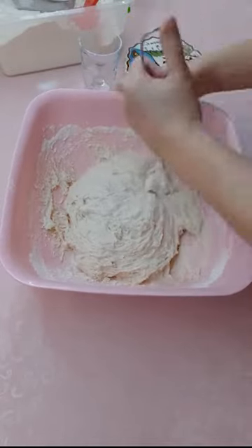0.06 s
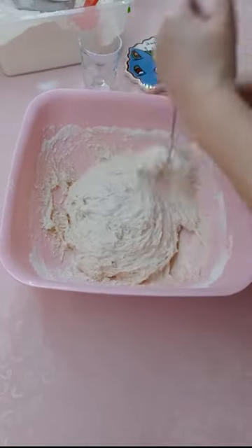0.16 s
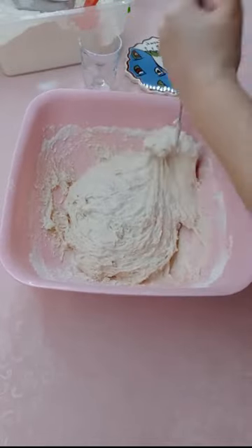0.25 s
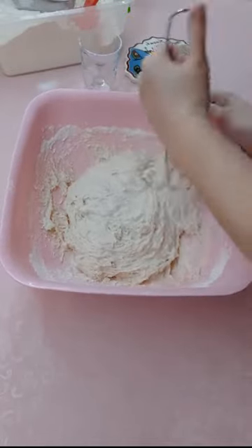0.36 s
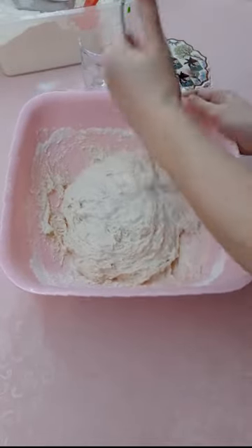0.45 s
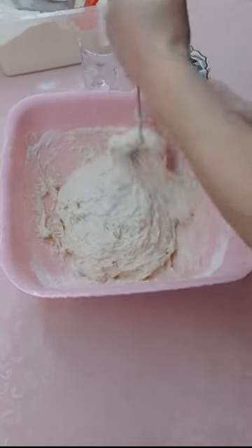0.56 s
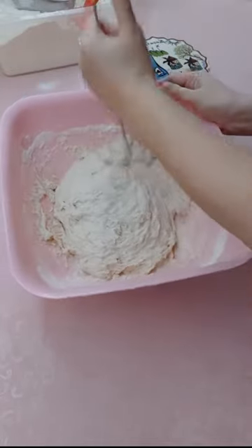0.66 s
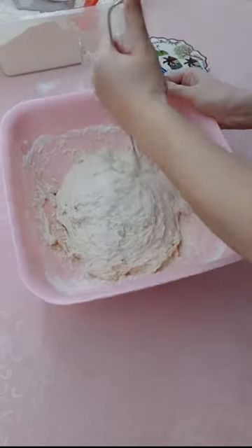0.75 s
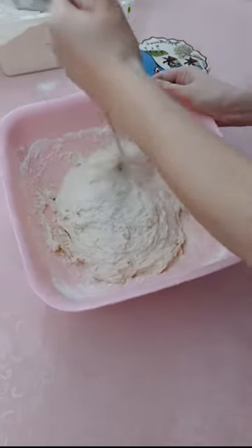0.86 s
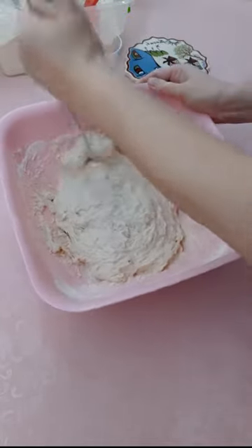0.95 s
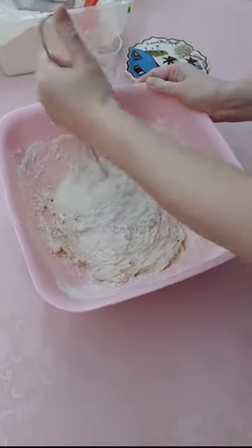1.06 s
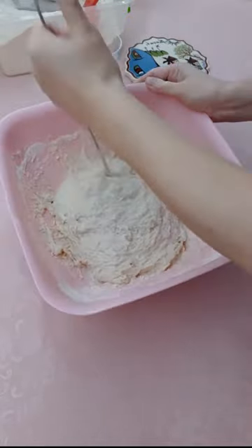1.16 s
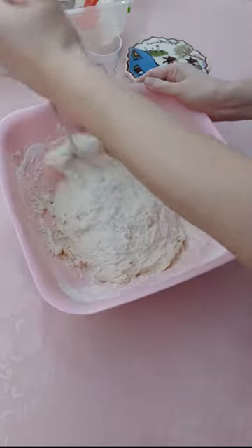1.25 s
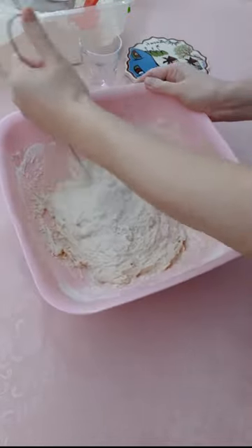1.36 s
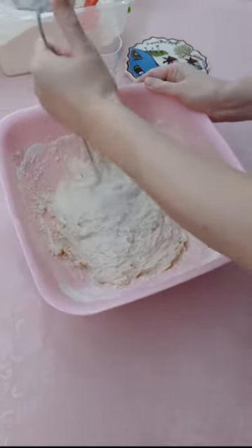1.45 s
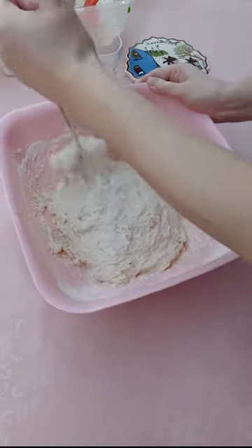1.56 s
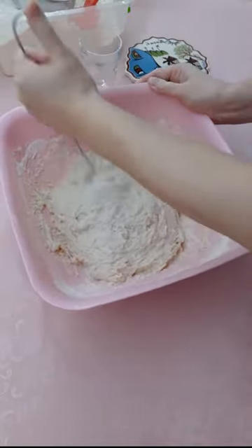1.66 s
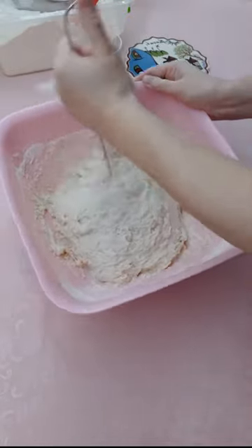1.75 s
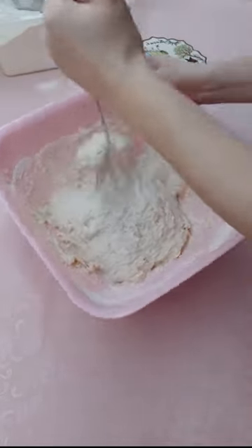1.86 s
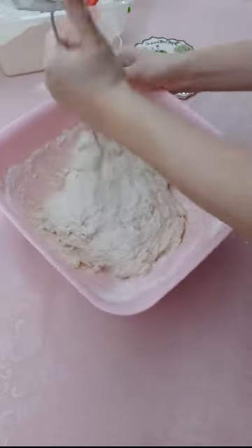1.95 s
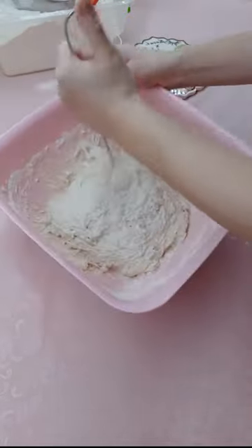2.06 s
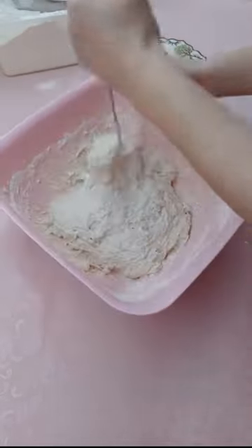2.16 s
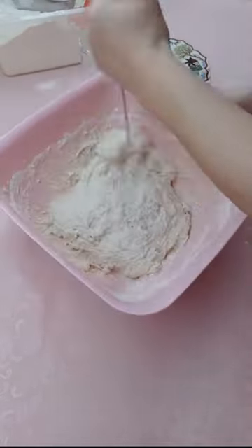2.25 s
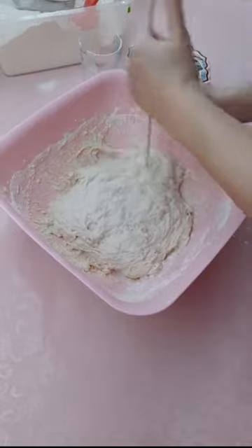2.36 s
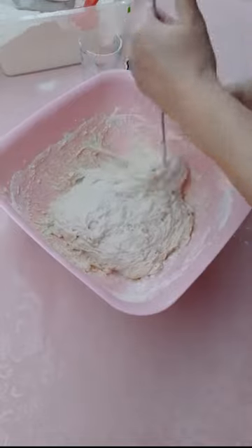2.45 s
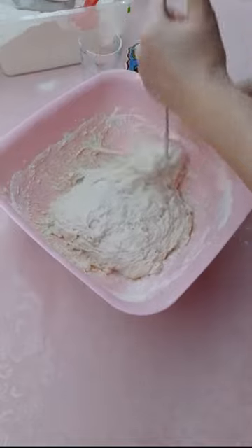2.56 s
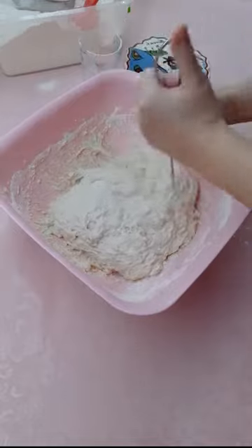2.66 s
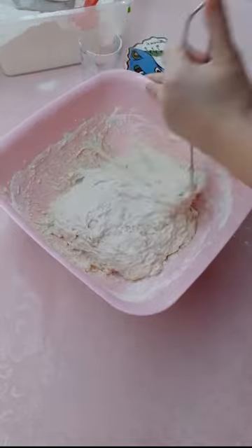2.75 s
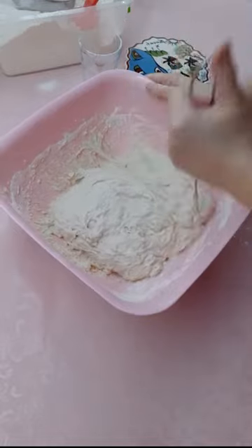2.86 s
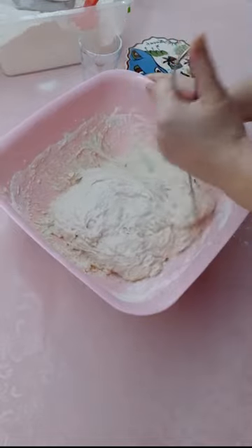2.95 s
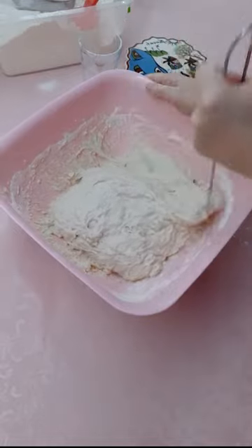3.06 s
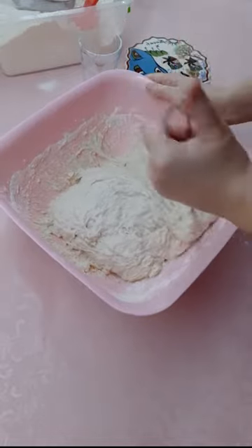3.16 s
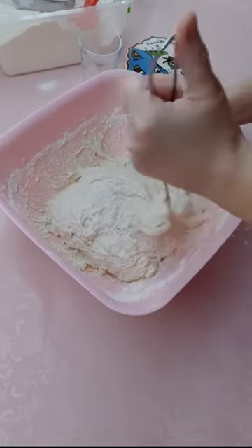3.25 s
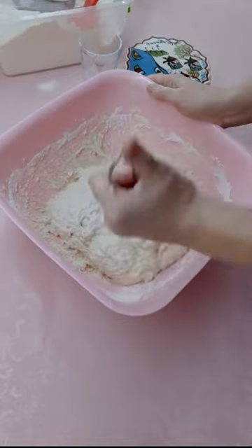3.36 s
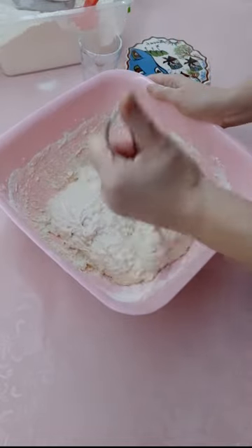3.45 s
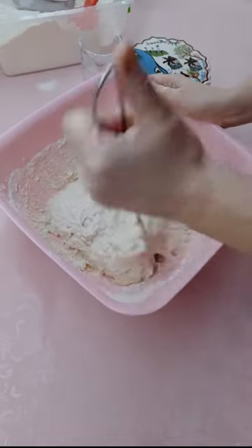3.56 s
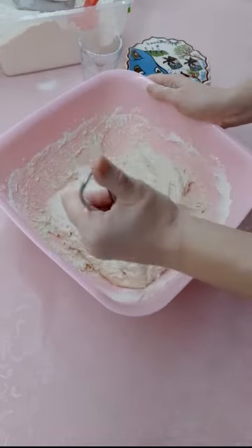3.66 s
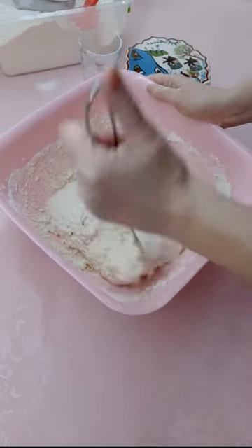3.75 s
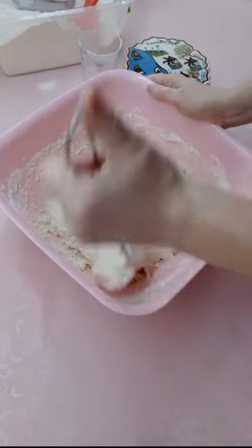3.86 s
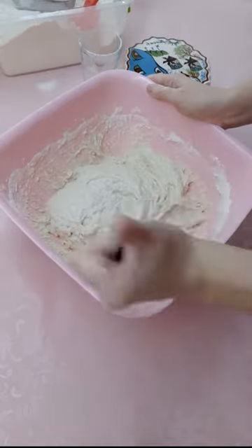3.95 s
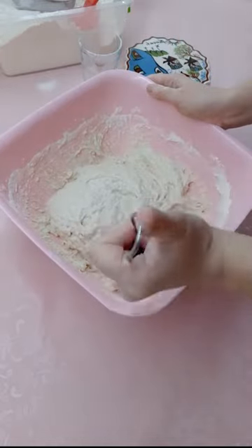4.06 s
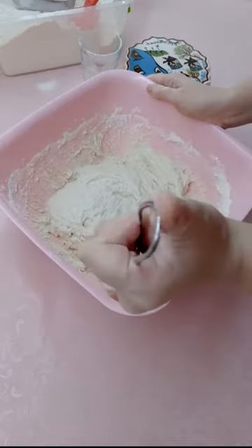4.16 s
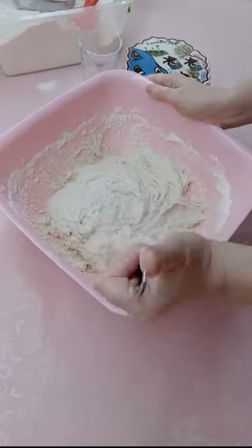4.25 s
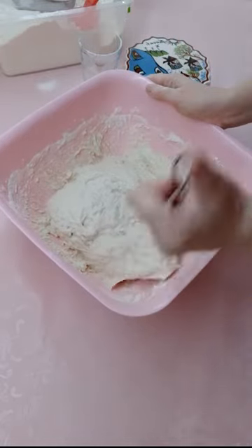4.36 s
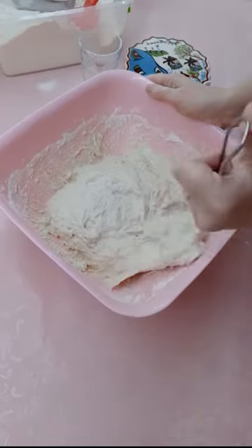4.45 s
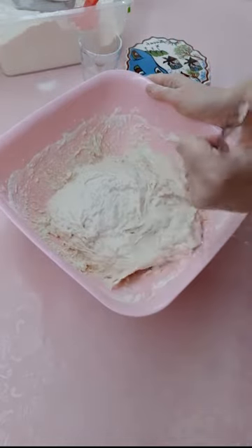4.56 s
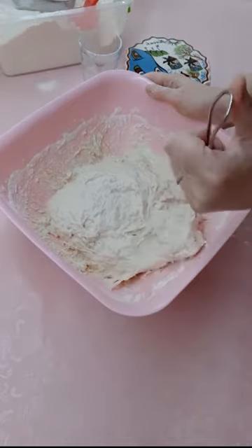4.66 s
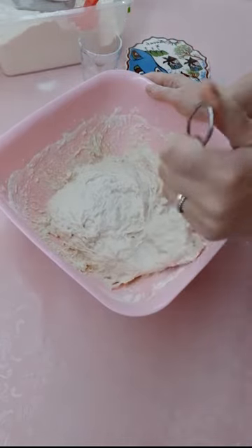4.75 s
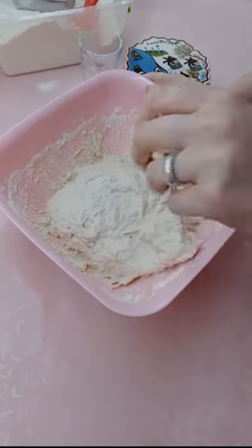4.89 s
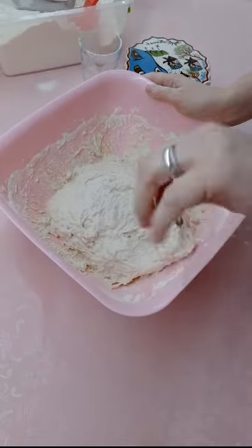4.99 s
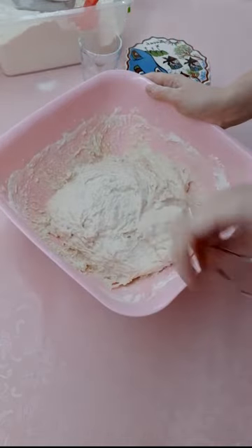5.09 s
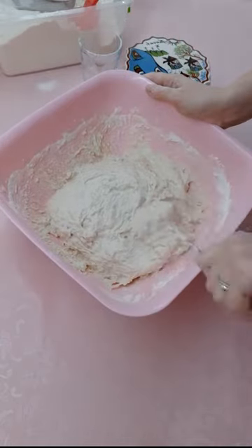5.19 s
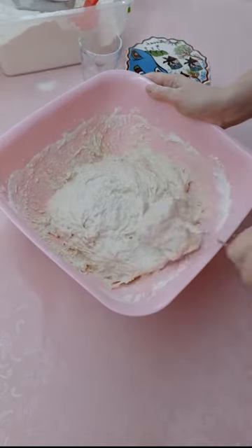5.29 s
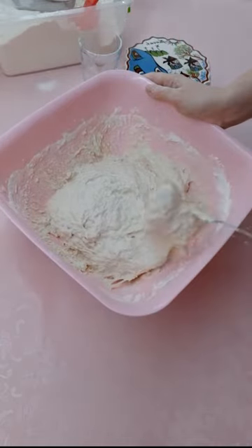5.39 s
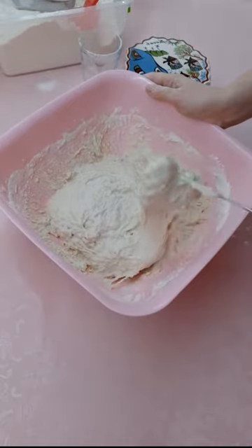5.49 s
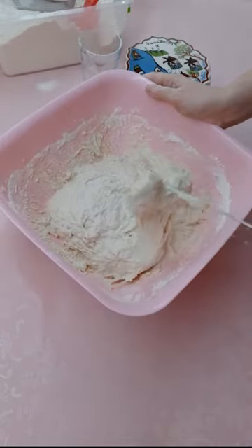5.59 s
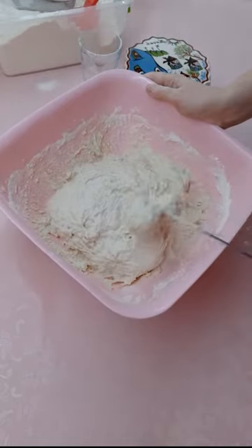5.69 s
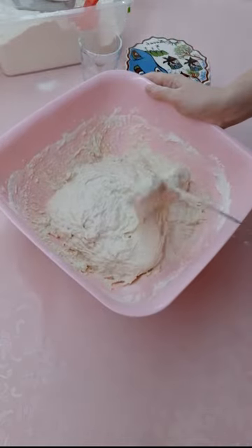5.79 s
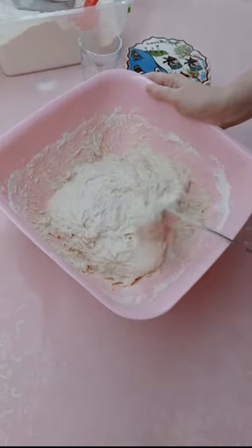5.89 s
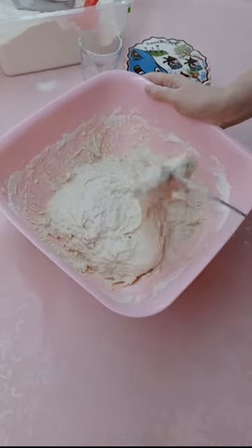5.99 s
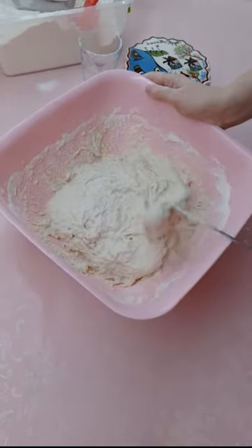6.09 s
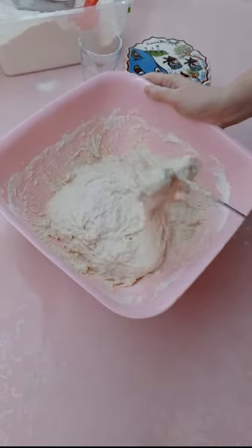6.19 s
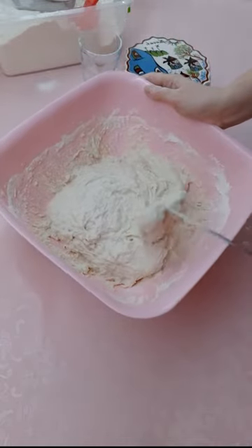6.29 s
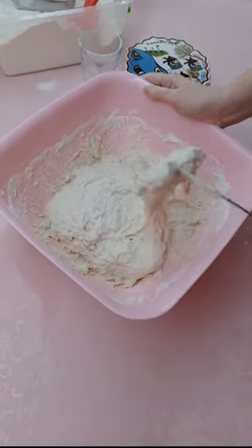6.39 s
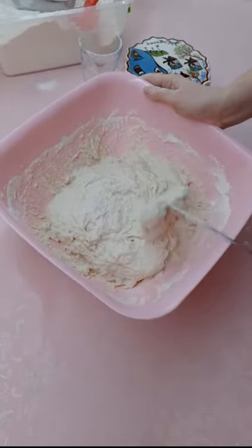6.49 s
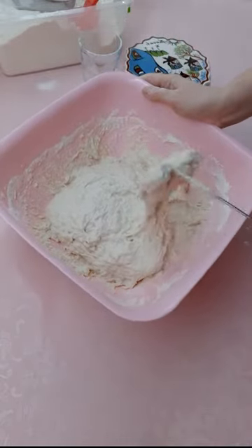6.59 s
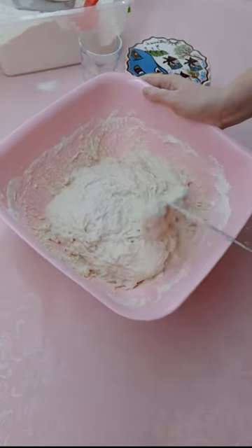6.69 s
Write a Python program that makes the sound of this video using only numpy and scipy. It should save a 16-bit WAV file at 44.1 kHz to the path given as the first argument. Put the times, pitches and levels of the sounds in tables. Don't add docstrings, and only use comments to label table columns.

```python
import sys
import numpy as np
from scipy import signal
from scipy.io import wavfile

SR = 44100
rng = np.random.default_rng(int(sys.argv[2]) if len(sys.argv) > 2 else 0)


def volts_from_decibels(level):
    exponent = np.asarray(level, float) / 20
    return 10 ** exponent


def persist_wave(psi):
    counts = np.round(np.clip(psi, -1, 1) * 32767).astype(np.int16)
    wavfile.write(sys.argv[1], SR, np.atleast_2d(counts).T)


N = 296793
T = np.arange(N) / SR

# pitch_hz, level_db, t60_s (time to fade by 60 dB)
BASE_TONES = [(75.2, -22, 0.75), (119.9, 1, 0.1), (135.6, -8, 0.27), (166.5, -17, 0.36)]
# pitch_hz, level_db, t60_s
HOLLOW_TONES = [(207, -10, 0.14), (241.1, 0, 0.12), (303.5, -0.5, 0.11), (344.2, -5.5, 0.23),
                (411, -12, 0.18)]
# pitch_hz, level_db, t60_s
WIRE_TONES = [(2310, -14.5, 0.026), (2660, -13, 0.034), (2896, 1.5, 0.018)]


def at_hz(points, hz):
    curve_hz, values = np.array(points)[:, 0], np.array(points)[:, 1]
    return np.interp(np.log(hz), np.log(np.maximum(curve_hz, 1)), values)


def rms_one(x):
    return x / np.sqrt(np.mean(x ** 2) + 1e-30)


def delay(x, s):
    k = max(round(s * SR), 0)
    return np.concatenate([np.zeros(k), x[:len(x) - k]])


def above(x, hz, order=2):
    return signal.sosfilt(signal.butter(order, hz, "high", fs=SR, output="sos"), x + 1e-18)


def soften(x, hz):
    r = np.exp(-2 * np.pi * hz / SR)
    return signal.lfilter([(1 - r) ** 2], [1, -2 * r, r * r], x + 1e-18)


def clicks(times, db):
    out = np.zeros(N)
    places = np.minimum((np.asarray(times) * SR).astype(int), N - 1)
    np.add.at(out, places, volts_from_decibels(db))
    return out


def ring(x, hz, t60):
    r, w = volts_from_decibels(-60 / (t60 * SR)), 2 * np.pi * hz / SR
    return signal.lfilter([0, np.sin(w)], [1, -2 * r * np.cos(w), r * r], x + 1e-18)


def puff_shape(rise_s, t60):
    t = np.arange(round(.3 * SR)) / SR
    shape = (1 - np.exp(-(t / rise_s) ** 2)) * volts_from_decibels(-60 * t / t60)
    return shape / shape.max()


def burst(times, db, rise_s, t60):
    return signal.fftconvolve(clicks(times, db), puff_shape(rise_s, t60))[:N]


def fading(s, before_s, after_s, fade_db):
    return fade_db * np.maximum(-(T - s) / before_s, (T - s) / after_s)


def bands(size):
    # pitch_hz, likeness (1 = the same)
    likeness = [(60, 1), (250, 0.64), (600, 0.21), (1400, 0.97), (3000, 0), (7000, 0), (15000, 0.2)]
    edges_hz = 32 * 2 ** np.arange(0, 9.3, .5)
    white = rng.standard_normal((2, 2, size))
    for k, (low_hz, high_hz) in enumerate(zip(edges_hz, edges_hz[1:])):
        band = signal.butter(2, [low_hz, high_hz], "band", fs=SR, output="sos")
        mid, side = signal.sosfilt(band, white[k % 2])
        hz = np.sqrt(low_hz * high_hz)
        alike = np.clip(at_hz(likeness, hz), -1, 1)
        yield hz, np.sqrt(1 + alike) * mid + np.sqrt(1 - alike) * side * [[1], [-1]]


def kitchen(near, sent):
    # pitch_hz, left_db, right_db, t60_s
    standing = [(423, -28.5, -19, 0.4), (514.3, -14, -13, 0.42), (539.7, -18, -15, 0.49),
                (571.4, -19.5, -15, 0.2), (654, -24.5, -21.5, 0.11), (774, -22, -20.5, 0.095),
                (870.3, -20, -0.5, 0.19), (974, -32, -16.5, 0.18), (1020, -18.5, -18.5, 0.12)]
    # delay_s, left_db, right_db
    reflections = [(.011, -20, -10), (.0165, -9, -20), (.0505, -19, -19), (.101, -20, -20)]
    # pitch_hz, t60_s
    room_t60 = [(80, 0.32), (160, 0.54), (420, 0.41), (1100, 0.46), (2900, 0.34), (7700, 0.37),
                (15000, 0.28)]
    # pitch_hz, level_db
    room_colour = [(60, -27), (150, -33.5), (350, -38.5), (600, -35.5), (1200, -34.5), (3000, -35.5),
                   (8000, -41.5), (15000, -41)]
    size = round(.7 * SR)
    t = np.arange(size) / SR
    tail = np.zeros((2, size))
    for hz, noise in bands(size):
        tail += noise * volts_from_decibels(at_hz(room_colour, hz) - 60 * t / at_hz(room_t60, hz))
    tail *= 1 - np.exp(-t / .006)
    for hz, left_db, right_db, t60 in standing:
        wave = np.sin(2 * np.pi * hz * t) * volts_from_decibels(-60 * t / t60 - 41)
        tail += wave * volts_from_decibels(np.array([[left_db], [right_db]]))
    dull = soften(near, hz=1600)
    echoes = np.zeros((2, N))
    for s, left_db, right_db in reflections:
        echoes[0] += delay(dull[0], s) * volts_from_decibels(left_db)
        echoes[1] += delay(dull[1], s) * volts_from_decibels(right_db)
    return echoes + signal.fftconvolve(sent[None], tail, axes=1)[:, :N]


def wall(strikes):
    # pitch_hz, left_db, right_db, t60_s
    wall_tones = [(548.3, -1, -3, 0.049), (631, -20.5, 7.5, 0.013), (912, 2.5, -24, 0.017),
                  (1256, -18, -15.5, 0.031), (1590, -14.5, -7, 0.0075), (1970, -23, -12, 0.0075),
                  (3900, -37, -43.5, 0.0093), (1064, -5, -13.5, 0.015), (2220, -29, -25.5, .01),
                  (749, -3.5, -20.5, 0.013)]
    right_lag_s = .0013
    out = np.zeros((2, N))
    for k, (hz, left_db, right_db, t60) in enumerate(wall_tones):
        tone = ring(strikes, hz, t60) * (-1) ** k
        out[0] += volts_from_decibels(left_db) * tone
        out[1] += volts_from_decibels(right_db) * delay(tone, right_lag_s * (k < 3))
    return above(out, hz=378)


def low(strikes, tones):
    both = sum(ring(strikes, hz, t60) * volts_from_decibels(db) for hz, db, t60 in tones)
    return both * volts_from_decibels(np.array([[-1.0], [1.0]]))


def squeak():
    loudest_s = 3.24
    hz = 1440 - 12000 * np.clip(T - loudest_s + .012, 0, .04)
    db = -54 - fading(loudest_s, before_s=.055, after_s=.022, fade_db=18)
    rough = 1 + .7 * rms_one(soften(rng.standard_normal(N), hz=200))
    return volts_from_decibels(db) * rough * np.sin(2 * np.pi * np.cumsum(hz) / SR)


def stirring(hiss):
    # time_s, level_db
    stir = [(0.0, -44.5), (0.2, -101), (0.41, -56), (0.68, -55), (0.85, -67), (1.01, -46.5), (1.28, -61),
            (1.51, -60), (1.75, -48.5), (2.16, -56.5), (2.3, -46), (2.51, -88), (2.93, -64), (3.38, -80),
            (3.65, -62.5), (4.0, -98), (4.6, -60.5), (5.1, -77.5)]
    # time_s, rumble_db, rubbing_hiss_db, spread_s
    drags = [(0.501, -72, -73, 0.25), (0.761, -55, -83, 0.21), (1.07, -49, -114, 0.22),
             (1.67, -33, -90, 0.05), (1.85, -51, -70, 0.28), (2.23, -45.5, -60, 0.069),
             (2.35, -67, -69.5, 0.074), (0.82, -93, -67.5, 0.048), (3.05, -53.5, -110, 0.24),
             (4.07, -48.5, -100, 0.2), (4.25, -42.5, -101, 0.16), (4.42, -57, -106, .1)]
    push_s, push_levels = np.transpose(stir)
    push_db = np.interp(T, push_s, push_levels, left=-140, right=-140)
    grind = volts_from_decibels(-70.5 + .45 * (push_db + 76.5))
    rub = volts_from_decibels(-84 + 0.38 * (push_db + 52))
    for s, rumble_db, rub_db, spread_s in drags:
        drag = volts_from_decibels(-fading(s, spread_s, spread_s, fade_db=22))
        grind += drag * volts_from_decibels(rumble_db)
        rub += drag * volts_from_decibels(rub_db)

    sizes = volts_from_decibels(6.4 * np.minimum(rng.exponential(1, (2, N)), 4)) * rng.choice([-1, 1], (2, N))
    slips_per_s = np.array([[500], [150]])
    whisk_slips, bowl_slips = sizes * (rng.random((2, N)) < slips_per_s / SR)
    scrape = rms_one(wall(above(soften(whisk_slips, hz=4880), hz=700, order=1)))
    twang = rms_one(low(whisk_slips, WIRE_TONES))
    rumble = rms_one(low(bowl_slips, BASE_TONES) + volts_from_decibels(-5) * low(bowl_slips, HOLLOW_TONES))
    flicker = volts_from_decibels(0.5 * rms_one(soften(rng.standard_normal(N), hz=25.3)))
    moving = volts_from_decibels(push_db - 9) * scrape + volts_from_decibels(push_db - 24.5) * twang
    return moving + grind * volts_from_decibels(-15.5) * rumble + rub * volts_from_decibels(8.0) * flicker * hiss


def smacks(hiss):
    # time_s, hiss_db, wall_db, fine_spit_db, t60_s
    tears = [(0.307, -45.5, -41, -30, 0.15), (1.159, -36.5, -43.5, -23, 0.045),
             (1.304, -40, -49, -77, 0.061), (1.491, -43.5, -49, -30, 0.11), (1.76, -48.5, -49.5, -36, 0.57),
             (1.945, -51, -39.5, -39, 0.042), (2.086, -61, -42, -33.5, 0.078),
             (2.709, -57, -58.5, -55, 0.052), (3.4653, -52, -65, -76, 0.099),
             (3.742, -52.5, -59, -85, 0.075), (4.208, -39.5, -39.5, -21.5, 0.17),
             (4.979, -70, -73.5, -37, 0.05), (0.006, -62, -63, -40, 0.22),
             (5.1436, -37.5, -58, -23.5, 0.14)]
    # time_s, hiss_db, wall_db, fine_spit_db, t60_s
    peels = [(0.028, -62.5, -69, -72, 0.35), (0.239, -55.5, -52, -42.5, 0.21),
             (0.838, -43.5, -39, -26.5, 0.034), (1.3339, -49, -41.5, -68, 0.094),
             (2.172, -50.5, -50, -41, 0.21), (2.249, -63, -45, -67, 0.048), (2.329, -65, -47, -41.5, 0.17),
             (2.443, -53.5, -60.5, -86, 0.16), (2.583, -60, -52.5, -36.5, 0.093),
             (2.733, -56.5, -61, -62, 0.078), (3.1594, -75, -56.5, -52.5, 0.41),
             (3.201, -65, -54, -69, 0.055), (3.619, -64, -55.5, -72, 0.066),
             (4.458, -70, -56.5, -42.5, 0.14), (4.715, -76, -74, -51.5, 0.22), (4.824, -73, -71, -46, 0.16),
             (4.964, -65, -64, -38.5, 0.097), (2.067, -58, -39.5, -52, 0.044), (4.192, -68, -55, -75, 0.12),
             (3.88, -58, -43.5, -70, 0.095)]
    grain = 1.6
    tugs = rng.standard_normal(N + 1)
    rustle = rms_one(wall(np.diff(tugs * np.abs(tugs) ** grain, n=2, prepend=0)))
    spit = above(hiss, hz=7720, order=4)
    dull = rms_one(soften(hiss, hz=5700))
    puffs = [(*row, 0.0053) for row in tears] + [(*row, 0.16 * row[-1]) for row in peels]
    out = np.zeros((2, N))
    for s, db, wall_db, spit_db, t60, rise_s in puffs:
        shape = puff_shape(rise_s, t60)
        i = max(round((s - 0.87 * rise_s) * SR), 0)
        part = slice(i, i + len(shape))
        puff = volts_from_decibels(db - 8.0) * dull[:, part]
        puff += volts_from_decibels(spit_db - 14.5) * spit[:, part]
        puff += volts_from_decibels(wall_db - 7.0) * rustle[:, part]
        out[:, part] += shape * puff
    return out


def struck_bowl(strikes, thuds, hollow, twangs, cracks, ticks):
    wire = low(twangs, WIRE_TONES)
    close = wall(strikes) + cracks + volts_from_decibels(1.0) * wire
    body = low(soften(thuds, hz=141), BASE_TONES) + low(soften(hollow, hz=696), HOLLOW_TONES)
    boom = ring(strikes, 570.0, 0.013) * volts_from_decibels(5.5)
    boom -= ring(strikes, 923, 0.0066) * volts_from_decibels(2.0)
    boom += ring(strikes, 1700, 0.0025) * volts_from_decibels(3.5)
    spread = above(boom, hz=327) + above(ticks, hz=1930)
    return close, wire + body, spread


def bumps_and_taps(crack_noise):
    # time_s, wall_db, crack_db, thud_db, hollow_db
    bumps = [(0.309, -29.5, -56, -33, -59), (0.349, -34.5, -56, -73, -44.5),
             (0.771, -47, -50.5, -38.5, -85), (1.63, -30, -34, -46, -21), (2.074, -34, -40.5, -23.5, -34.5),
             (2.845, -34, -50, -41, -41.5), (3.064, -35, -56.5, -38.5, -45.5),
             (3.873, -32.5, -57, -27.5, -44), (3.889, -10.5, -35, -26.5, -27.5),
             (4.192, -36.5, -73, -32.5, -40), (4.217, -26.5, -46.5, -28, -40.5)]
    # time_s, wall_db, crack_db
    taps = [(0.274, -36, -59), (0.297, -31.5, -50), (0.628, -36, -53), (0.656, -30, -56.5),
            (0.677, -28.5, -58), (0.991, -37, -53), (1.043, -55, -54), (1.306, -36, -52),
            (1.351, -24.5, -60), (1.371, -57, -51.5), (1.976, -33, -53), (2.044, -41, -50.5),
            (3.074, -25, -44.5), (3.617, -40.5, -58), (4.461, -37.5, -87), (4.857, -82, -65),
            (4.58, -51, -78)]
    full_taps = [(s, db, crack_db, db - 39, db - 16) for s, db, crack_db in taps]
    s, wall_db, crack_db, thud_db, hollow_db = np.transpose(bumps + full_taps)
    return struck_bowl(
        strikes=soften(clicks(s, wall_db - 9), hz=2030),
        thuds=clicks(s, thud_db - 9),
        hollow=clicks(s, hollow_db - 9.5),
        twangs=clicks(s, crack_db - 4),
        cracks=burst(s, crack_db, rise_s=0.00087, t60=0.058) * crack_noise,
        ticks=clicks(s, crack_db + 25.5))


def knocks(crack_noise):
    # time_s, peak_db, thud_db, rocking_db, hardness (0-1)
    rim_knocks = [
        (5.112, -3, -27.5, -53, 0.47),
        (5.652, -1, -15.5, -23.5, 0.67),
        (5.856, -4, -10.5, -25.5, 0.87),
        (6.046, -4.5, -9.5, -19.5, 0.99),
        (6.241, -6, -9.5, -24.5, 1),
        (6.436, -5, -11, -19.5, 1),
        (6.638, -5, -41, -22, 0.93),
    ]
    # delay_s, level_db, pitch_hz
    rocks = [(0.052, 1.5, 153.3), (.086, -6, 119), (.122, -12.5, 92)]
    s, peak_db, thud_db, rock_db, hardness = np.transpose(rim_knocks)
    padding = 1 - hardness
    crack_db = -21 - 22 * padding
    touch = clicks(s - .0005, peak_db - 32.5) + clicks(s + 0.001033, peak_db + 1.0)
    hard = np.interp(T, s, np.clip(hardness, 0, 1) ** 1.82)
    blow = hard * soften(touch, hz=3180) + (1 - hard) * soften(touch, hz=694) * volts_from_decibels(-9)
    late_thump = soften(clicks(s + .049, peak_db - 11), hz=593)
    close, body, spread = struck_bowl(
        strikes=blow + late_thump,
        thuds=clicks(s + 0.0052, thud_db - 12.5),
        hollow=clicks(s + 0.0027, peak_db - 39.5),
        twangs=clicks(s, -32 + 15.5 * padding),
        cracks=burst(s - .001, crack_db + 10.5, rise_s=0.00044, t60=0.021) * crack_noise,
        ticks=clicks(s + .001, crack_db + 24))
    snap = ring(clicks(s, crack_db + 7.5), 1900, 0.005)
    snap += ring(clicks(s + .0012, crack_db + 13.5), 1050, .008)
    for lag_s, db, hz in rocks:
        body = body + ring(soften(clicks(s + lag_s, rock_db + db), hz=205), hz, 0.07)
    return close + snap, body, spread


def scene():
    # pitch_hz, level_db per Hz
    hiss_colour = [(1200, -23), (2200, 3), (3500, -1.5), (7000, 2), (11000, -1.5), (15000, -8.5),
                   (17000, -8)]
    # pitch_hz, level_db per Hz
    crack_colour = [(1180, -2), (2000, -8), (5820, -19.5), (6590, -8.5), (7260, -28.5), (8000, -17.5),
                    (13100, -20), (16000, -39)]
    # pitch_hz, level_db per Hz
    floor_colour = [(18, -40), (30, -16), (125, -5.5), (835, -7), (1150, -24), (3300, -27), (14500, -18),
                    (16500, -29)]
    noise = list(bands(N))

    def coloured(colour):
        return rms_one(sum(band * volts_from_decibels(at_hz(colour, hz)) for hz, band in noise))

    hiss = coloured(hiss_colour)
    crack_noise = coloured(crack_colour)[:, ::-1]
    background = volts_from_decibels(-73.5) * np.roll(coloured(floor_colour), 2 * SR, axis=1)
    slip = squeak()
    bump_close, bump_body, bump_spread = bumps_and_taps(crack_noise)
    knock_close, knock_body, knock_spread = knocks(crack_noise)
    close = bump_close + knock_close
    bowl = bump_body + knock_body + smacks(np.roll(hiss, SR, axis=1)) + stirring(hiss)
    sent = bowl.mean(axis=0) + bump_spread + knock_spread + volts_from_decibels(-14) * slip
    return bowl + close + slip + kitchen(bowl + close, sent) + background


def band_limit(x):
    return signal.sosfilt(signal.butter(12, 16850, fs=SR, output="sos"), x)


def record(dry):
    right = delay(dry[1], 7 / SR)
    ports = above(np.array([dry[0], right]), hz=68.7, order=4)
    ports = .99 * np.tanh(ports / .99)
    mix = signal.sosfilt(signal.cheby2(10, 50, 16700, fs=SR, output="sos"), ports)
    return band_limit(mix)


dry = scene()
out = record(dry)
persist_wave(out)
```